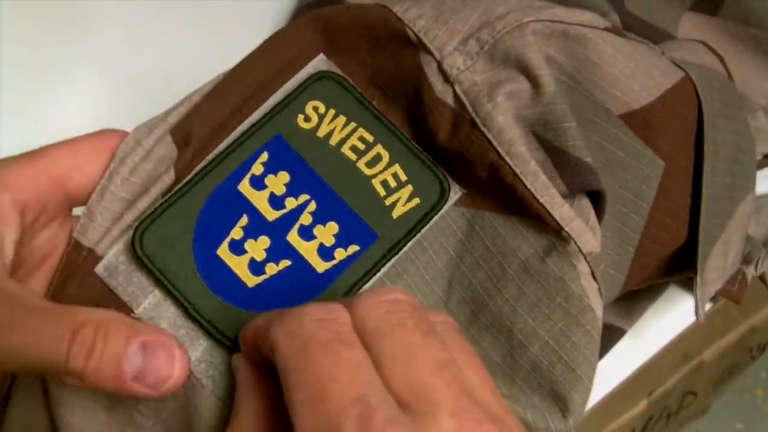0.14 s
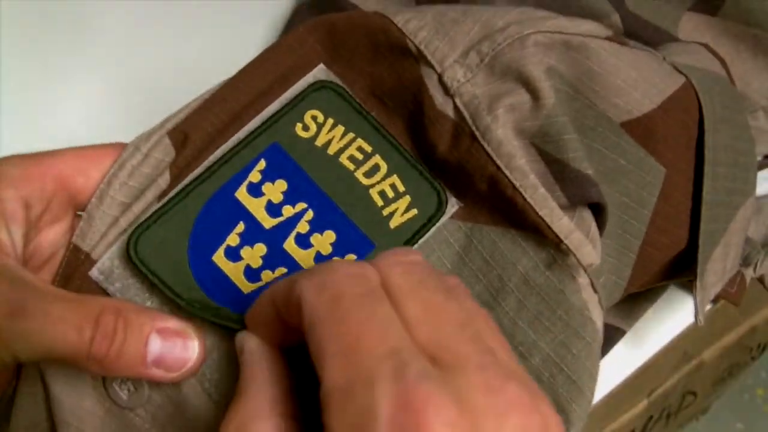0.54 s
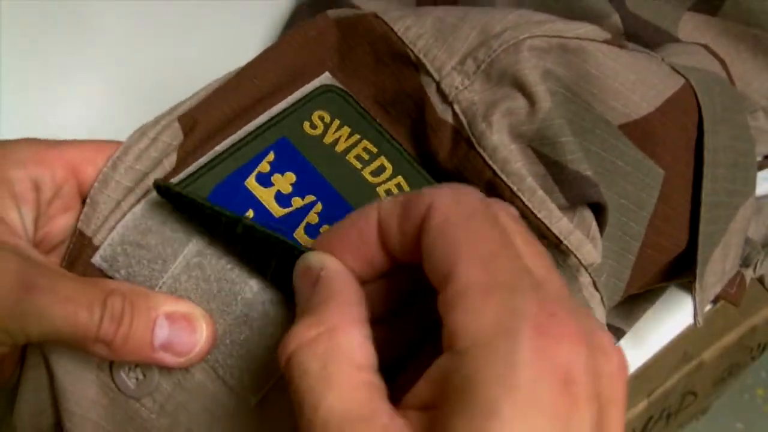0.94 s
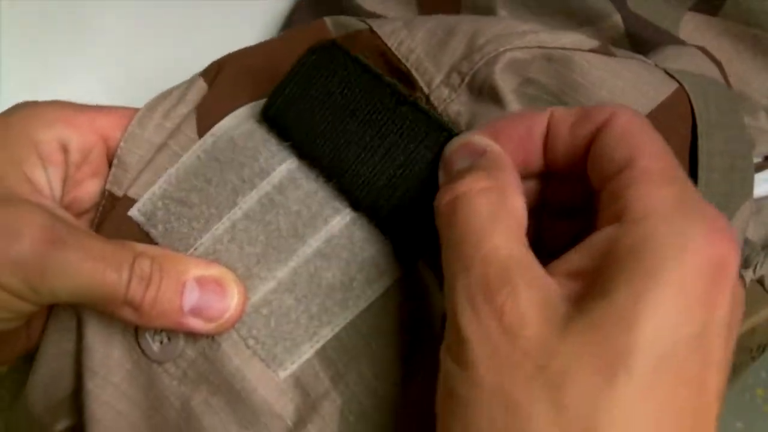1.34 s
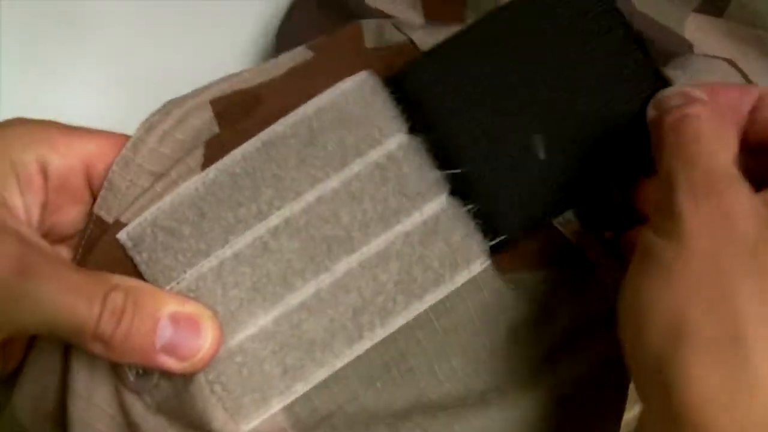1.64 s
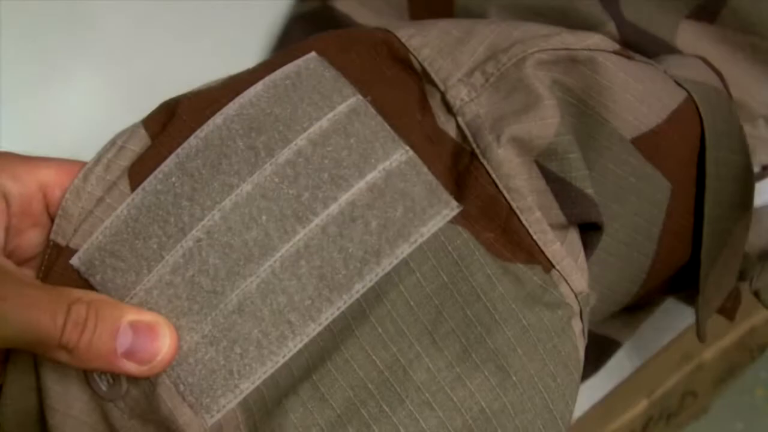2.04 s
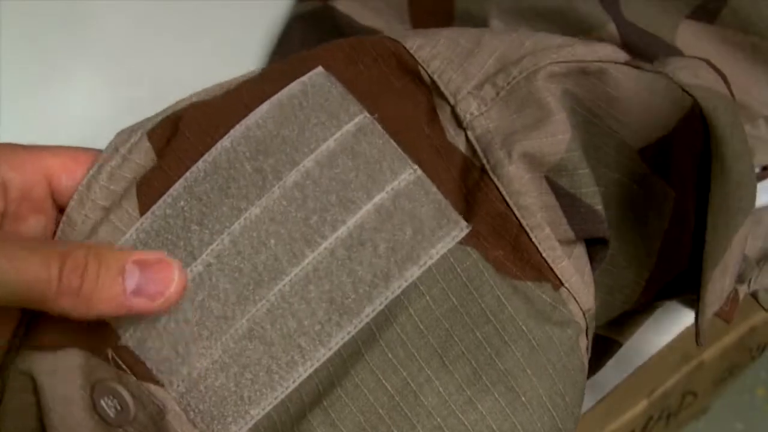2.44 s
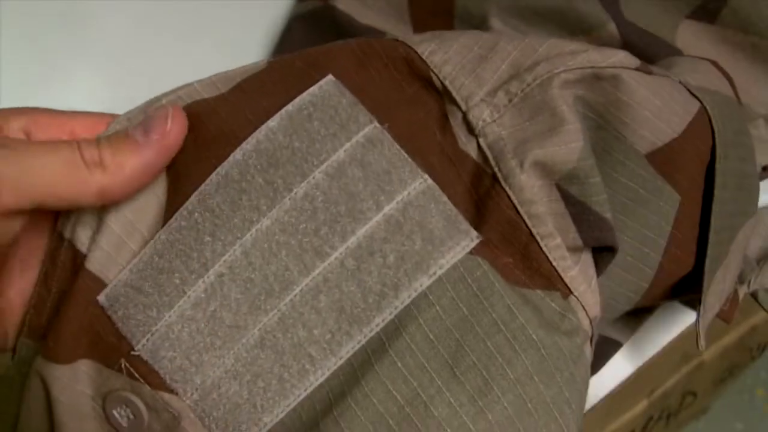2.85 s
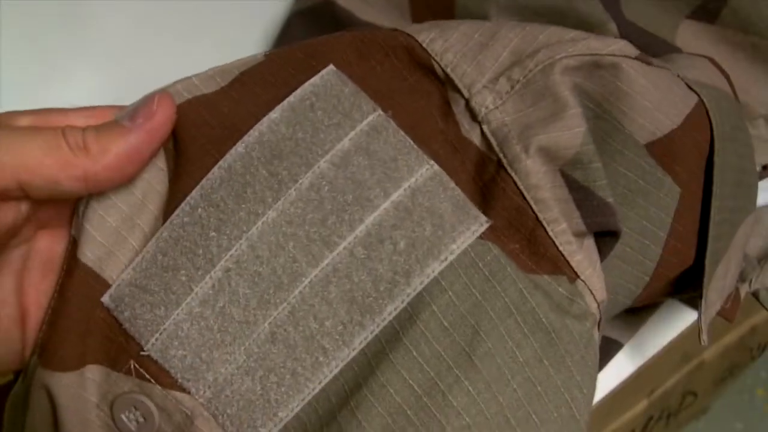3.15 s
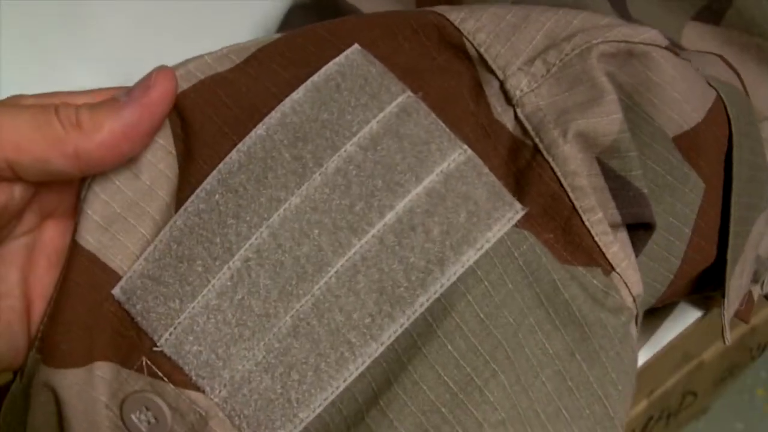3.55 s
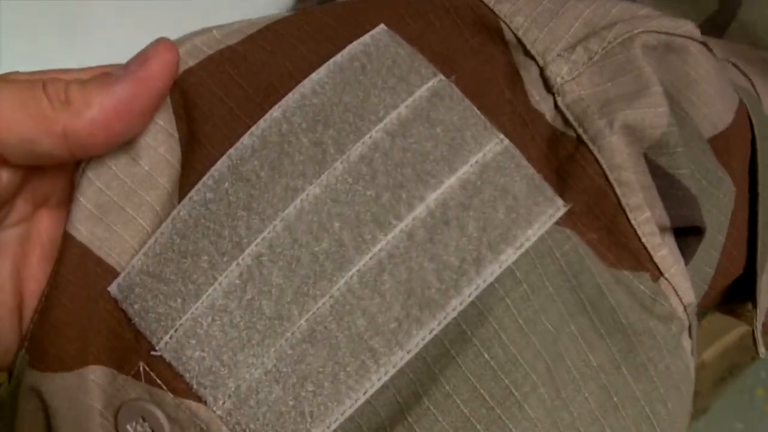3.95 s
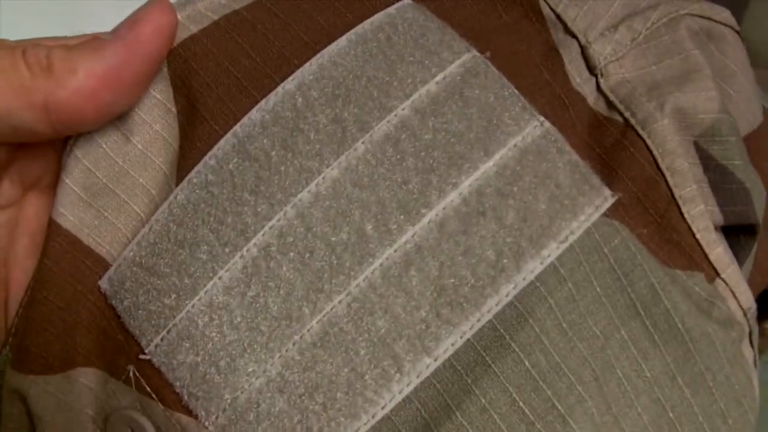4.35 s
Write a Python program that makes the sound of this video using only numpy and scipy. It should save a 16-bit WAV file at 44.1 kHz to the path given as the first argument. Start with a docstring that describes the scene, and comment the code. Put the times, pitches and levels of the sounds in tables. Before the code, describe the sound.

In a small, quiet room, a faint rustle and soft plastic ticks lead into crisp, separate snaps as fingers pick at a hook-and-loop patch. The snaps crowd together and give way to two short, bright rips with a slight thud of stretched cloth. The rest is much quieter: hands brush the jacket and a small plastic part ticks now and then, all close to the microphone.

```python
"""A faint rustle and soft plastic ticks, then sharp snaps: a hook-and-loop patch is picked off a sleeve.
Close to the microphone, in a small quiet room, single hooks snap free as the corner lifts, then crackle,
then let go in whole rows in two quick rips that shake the stretched cloth and the stiff backing.
The jacket rustles under the hands, and a small plastic part ticks near the microphone throughout."""
import sys
import numpy as np
from scipy import signal
from scipy.fft import rfft, irfft
from scipy.io import wavfile
from scipy.ndimage import uniform_filter1d

SR = 44100
rng = np.random.default_rng(int(sys.argv[2]) if len(sys.argv) > 2 else 0)


def generate_wav(signal):
    """Clip the signal to [-1, 1] and save it as 16-bit WAV at the path in sys.argv[1]."""
    frames = np.transpose(np.atleast_2d(signal))
    scaled = np.clip(frames, -1, 1) * 32767
    pcm = np.round(scaled).astype(np.int16)
    wavfile.write(sys.argv[1], SR, pcm)


N = 198625
TIME = np.arange(N) / SR


def from_db(db):
    """Decibels to gain."""
    return 10 ** (np.asarray(db) / 20)


def unit_energy(x):
    """Scale so that the squares sum to one."""
    return x / np.sqrt(np.sum(x ** 2) + 1e-20)


def convolve(x, response):
    """Pass a signal through an impulse response."""
    return signal.fftconvolve(x, response)[:N]


def colour(x, spectrum, size=4096):
    """Minimum-phase filter shaped by rows of freq_hz, level_db; white input keeps its power."""
    hz, db = np.transpose(spectrum)
    grid_hz = np.maximum(np.fft.rfftfreq(size, 1 / SR), 1)
    gain = from_db(np.interp(np.log(grid_hz), np.log(hz), db))
    cepstrum = irfft(np.log(gain))
    cepstrum[1:size // 2] *= 2
    cepstrum[size // 2 + 1:] = 0
    response = irfft(np.exp(rfft(cepstrum)))
    return convolve(x, unit_energy(response))


def drift(rate_hz, count=N, settle=4000):
    """Smooth random wander with a spread of 1."""
    lowpass = signal.butter(2, rate_hz, fs=SR, output="sos")
    slow = signal.sosfilt(lowpass, rng.standard_normal(count + settle))
    return slow[settle:] / slow.std()


def clicks(times, heights):
    """One impulse at each time."""
    return np.bincount(np.clip(np.round(times * SR).astype(int), 0, N - 1), heights, N)


def ring(x, hz, t60_s):
    """A unit click sets a dying tone of height 1 ringing."""
    decay, angle = from_db(-60 / (t60_s * SR)), 2 * np.pi * hz / SR
    return signal.lfilter([.5, 0, -.5], [1, -2 * decay * np.cos(angle), decay * decay], x + 1e-18)


# Room tone at the microphone: freq_hz, level_db
AIR_SPECTRUM = [(25, -29.5), (60, -24), (120, -16), (250, -9), (400, -0.5), (750, 0), (1200, 2.5),
                (1600, -2.5), (2500, -3.5), (5000, -5), (8000, -6), (11000, -4), (14800, -5),
                (15600, -25.5)]
def room_tone(level_db=-67.5):
    """The still air of the small room, a faint steady hiss."""
    return from_db(level_db) * colour(rng.standard_normal(N), AIR_SPECTRUM)


def reflections(t60_s, first_s=0.0022, smooth_bins=120):
    """Dense dying echoes that favour no pitch."""
    age = TIME[:SR // 2]
    onset = np.clip(age / first_s - .5, 0, 1)
    spectrum = rfft(rng.standard_normal(len(age)) * onset * from_db(-60 * age / t60_s))
    flattened = spectrum / np.sqrt(uniform_filter1d(np.abs(spectrum) ** 2, smooth_bins))
    echoes = irfft(flattened, len(age)) * onset
    return unit_energy(echoes[:-SR // 10])


# What the walls send back to the microphone: freq_hz, level_db
WALL_SPECTRUM = [(60, -10.5), (300, -2), (900, 0), (2000, 0), (6000, -1), (11000, -1), (16000, -3)]
def room_echo(x, early_db=-12.0, late_db=-28.5):
    """Quick scatter from the table and nearby things, then the faint tail of the room."""
    early = from_db(early_db) * reflections(t60_s=0.068)
    late = from_db(late_db) * reflections(t60_s=0.34)
    return colour(convolve(x, early + late), WALL_SPECTRUM)


# Hands sliding over the jacket, close by: middle_s, length_s, level_db
HAND_STROKES = [(0.09, 0.25, -66), (1.14, 0.11, -61.5), (1.893, 0.1, -65), (2.313, 0.022, -61),
                (2.45, 0.19, -63), (2.83, 0.24, -68), (3.136, 0.17, -67), (3.98, 0.31, -68)]
# Sliding cloth: freq_hz, level_db
RUSTLE_SPECTRUM = [(60, -35.5), (200, -13), (600, 0.5), (1200, 2), (2500, -6), (5000, -3.5), (8000, -2),
                   (11000, -1), (14500, -4.5), (16000, -25.5)]
def cloth_rustle(gain_db=0.5, grain_db=1.5, catches_per_s=90, catch_db=15.5):
    """Each stroke swells and fades; the weave makes it grainy, and now and then a thread catches."""
    power = sum(from_db(db) ** 2 * np.exp(-(2 * (TIME - middle) / length) ** 2)
                for middle, length, db in HAND_STROKES)
    catches = (rng.random(N) < catches_per_s / SR) * rng.uniform(-1.5, 1.1, N) * from_db(catch_db)
    sliding = rng.standard_normal(N) * from_db(grain_db * drift(rate_hz=300))
    return colour((sliding + catches) * np.sqrt(power) * from_db(gain_db), RUSTLE_SPECTRUM)


# Soft plastic ticks near the microphone: start_s, tick_db, low_ring_db
PLASTIC_TICKS = [(0.0206, -38, -59), (0.2538, -33, -77.5), (0.3883, -38.5, -63), (0.7058, -36.5, -62),
                 (0.8051, -34, -67), (1.0242, -35, -64.5), (1.1062, -33.5, -76), (1.357, -34, -60.5),
                 (1.4894, -34, -68.5), (2.0555, -44, -58.5), (2.3056, -34.5, -66.5), (2.425, -38.5, -60),
                 (2.5053, -49, -87), (2.6239, -38, -59), (2.7416, -31.5, -68), (2.841, -37.5, -69),
                 (3.8579, -32.5, -78), (4.027, -40, -60), (4.1259, -34, -64)]
# Modes of the plastic part, the two long ones first: pitch_hz, level_db, t60_s
PLASTIC_MODES = [(388, 9.5, 0.1), (1107, 7.5, 0.22), (571.7, -26, 0.046), (1058, -13, 0.045),
                 (1243.5, -5.5, .03), (1334, -7, 0.027), (1470, -20.5, 0.045), (2093, -26.5, 0.048),
                 (2420, -47, .014), (3040, -18, 0.023), (3873, -26, 0.0047)]
def plastic_ticks(touch_s=0.001935, touch_db=-6.5, bounce_s=0.00402, bounce_db=-1.5, contact_db=-3.0):
    """A light touch, the tick and a bounce strike the short modes; the tick also rings two long ones."""
    times, tick_db, low_ring_db = np.transpose(PLASTIC_TICKS)
    hardness_db = tick_db + 33.0   # above a usual tick
    high_ring_db = -63.0 + 1.8 * hardness_db
    long_modes, short_modes = PLASTIC_MODES[:2], PLASTIC_MODES[2:]
    pivot_hz = long_modes[1][0]
    ticks = np.zeros(N)
    for (hz, mode_db, t60_s), ring_db in zip(long_modes, (low_ring_db, high_ring_db)):
        ticks += ring(clicks(times, from_db(ring_db + mode_db)), hz, t60_s)
    bounce_times = times + bounce_s * (1 + 0.17 * rng.standard_normal(len(times)))
    for hz, mode_db, t60_s in short_modes:
        tilt_db = 0.95 * hardness_db * np.log2(hz / pivot_hz)   # a harder tick is brighter
        chance_db = 1.8 * rng.standard_normal(len(times))
        heights = from_db(tick_db + contact_db + mode_db + tilt_db + chance_db)
        touches = clicks(times - touch_s, heights * from_db(touch_db))
        bounces = clicks(bounce_times, heights * from_db(bounce_db))
        ticks += ring(touches + clicks(times, heights) + bounces, hz, t60_s)
    # so small a part gives no bass, and the soft contact no treble
    return signal.sosfilt(signal.butter(3, [300, 3450], "band", fs=SR, output="sos"), ticks)


def hook_cracks(times, heights, whip_db, whip_t60_s, size=160):
    """Each hook gives a sharp release, then its own brief whipping of fibres."""
    age = np.arange(size) / SR
    whip_envelope = unit_energy(from_db(-60 * age / whip_t60_s)) * from_db(whip_db)
    shapes = rng.standard_normal((len(times), size)) * whip_envelope
    shapes[:, 0] = 1   # the release
    shapes *= (heights / np.linalg.norm(shapes, axis=1))[:, None]
    return clicks((times[:, None] + age).ravel(), shapes.ravel())


# Spells of picking and slow peeling: start_s, end_s, snaps_per_s, bite_db, edge_db
PICKING_SPELLS = [(0.489, 0.511, 80, -30, -32), (0.76, 0.815, 54, -34, -28), (0.861, 0.871, 400, -15, -8.5),
                  (0.929, 0.955, 310, -9.5, -5), (1.134, 1.155, 90, -31, -38), (2.25, 2.65, 5, -52, -41),
                  (3.059, 3.181, 20, -44, -39.5)]
def picking(spread_db=3):
    """Hooks snap unevenly through each spell; gives rows of start_s, bite_db, edge_db."""
    snaps = []
    for start, end, snaps_per_s, bite_db, edge_db in PICKING_SPELLS:
        count = max(int(round((end - start) * snaps_per_s)), 1)
        times = start + (end - start) * (np.arange(count) + rng.random(count)) / count
        levels_db = [bite_db, edge_db] + spread_db * rng.standard_normal((count, 2))
        snaps.append(np.column_stack([times, levels_db]))
    return np.vstack(snaps)


# Lone hooks that stand out at close range: start_s, bite_db, edge_db
CLEAR_SNAPS = [(0.4364, -5, -5.5), (0.4712, -16.5, -23), (0.5245, -21, -21), (0.5293, -10, -5.5),
               (0.5822, -4.5, -3.5), (0.6395, -32, -38), (0.6538, -12, -4), (0.729, -29, -29),
               (0.744, -10, -3.5), (0.7452, -7.5, -8), (0.8053, -40, -22.5), (0.8474, -15.5, -10),
               (0.8784, -0.5, 1), (0.8834, -9.5, -9), (0.9028, -11, -1.5), (0.9097, -7, -4),
               (0.9198, -0.5, -4), (0.9235, -4, -8), (0.9696, -19, -1.5), (0.978, -18, -14),
               (0.9872, -7.5, -7), (1.0938, -14, -10.5), (1.12, -31, -27), (1.16, -14, -15.5),
               (1.1643, -9.5, -9), (1.282, -14, -3), (1.293, -11.5, -6), (1.4184, -36, -13),
               (1.421, -18, -5), (1.4312, -10.5, -8.5), (1.4537, -10.5, -7.5), (2.5273, -40, -35),
               (2.9182, -36, -36)]
# A lone hook's bite, its bright edge and the backing's thud: freq_hz, level_db
BITE_SPECTRUM = [(20, -66.5), (800, -25.5), (1500, -15.5), (2000, -9), (2700, -7.5), (3600, -1.5),
                 (5500, -1.5), (7000, 0.5), (8500, -11.5), (11000, -24)]
EDGE_SPECTRUM = [(20, -70), (3500, -29), (6500, -18), (8300, -3.5), (11000, 1), (13000, -1), (15000, -7.5),
                 (16500, -19.5)]
THUD_SPECTRUM = [(20, -44.5), (100, -22.5), (250, -20), (500, -3.5), (800, 4), (1000, 0.5), (1300, 5),
                 (1700, -15), (3000, -21), (8000, -47)]
def single_hooks(edge_lift_db=1.5, thud_db=-5.5, thud_fade_db_per_s=6.0, echo_db=-0.5):
    """Lone hooks crack, each with its own bite and bright edge, and jolt the backing; the room answers."""
    times, bite_db, edge_db = np.vstack([CLEAR_SNAPS, picking()]).T
    bite_gain, edge_gain = from_db(bite_db), from_db(edge_db + edge_lift_db)
    bites = colour(hook_cracks(times, bite_gain, whip_db=-1.5, whip_t60_s=0.0051), BITE_SPECTRUM)
    edges = colour(hook_cracks(times, edge_gain, whip_db=4.5, whip_t60_s=0.004), EDGE_SPECTRUM)
    fade_db = thud_fade_db_per_s * (times - times[0])   # the thud weakens as the patch comes loose
    thuds = colour(clicks(times, from_db(bite_db + thud_db - fade_db)), THUD_SPECTRUM)
    # the walls get each crack from all sides, so the chance colour of its whipping evens out there
    even_edges = colour(clicks(times, edge_gain), EDGE_SPECTRUM)
    even_bites = colour(clicks(times, bite_gain), BITE_SPECTRUM)
    return edges - bites - thuds + from_db(echo_db) * room_echo(even_edges - even_bites - thuds)


def freed_hooks(contour, hook_db=-7.5, spread_db=3.0, slip_db=3.0, slip_hz=240):
    """Hooks hold about equal force, so louder is more hooks a second; contour: time_s, level_db, boom_db."""
    knots_s, level_db, boom_db = np.transpose(contour)
    t = knots_s[0] + np.arange(max(int((knots_s[-1] - knots_s[0]) * SR), 2)) / SR
    power = from_db(np.interp(t, knots_s, level_db)) ** 2
    stick_slip = from_db(slip_db * drift(slip_hz, count=len(t))) ** 2
    peeled = np.cumsum(power * stick_slip)
    count = int(power.sum() / from_db(hook_db) ** 2) + 1
    jitter, polarity = rng.random((count, 2)).T
    times = np.interp((np.arange(count) + jitter) / count, peeled / peeled[-1], t)
    sizes = from_db(spread_db * np.clip(rng.standard_normal(count), -2, 2)) * np.sign(polarity - .5)
    heights = unit_energy(sizes) * np.sqrt(power.sum())
    return times, heights, np.interp(times, knots_s, level_db), np.interp(times, knots_s, boom_db)


# Clumps of hooks along the peel line: start_s, level_db
HOOK_CLUMPS = [(1.1751, -19.5), (1.186, -23.5), (1.195, -20.5), (1.266, -18.5), (1.5406, -18.5),
               (1.55, -24), (1.5567, -16), (1.651, -13.5), (1.717, -18.5), (1.74, -20.5), (1.7525, -20.5),
               (1.773, -16.5)]
def clumps(length_s=0.0038, boom_db=-15):
    """A clump gives way almost at once, in one short, level burst of hooks."""
    return [freed_hooks([(start, db, boom_db), (start + length_s, db, boom_db)])
            for start, db in HOOK_CLUMPS]


# Pulls on the patch: start_s, hardest_s, end_s, level_db, boom_db (cloth, relative to the cracks)
HAND_PULLS = [(1.199, 1.228, 1.247, -19, -14.5), (1.253, 1.262, 1.279, -20, -16),
              (1.56, 1.612, 1.646, -15, -12.5), (1.656, 1.674, 1.694, -19.5, -16),
              (1.697, 1.709, 1.737, -24, -14.5), (1.761, 1.788, 1.809, -21.5, -15)]
def pulls(tighten_db_per_s=105, ease_db_per_s=230):
    """Rows of hooks tear as the hand tightens slowly to its hardest moment, then eases faster."""
    hooks = []
    for start, hardest, end, db, boom_db in HAND_PULLS:
        start_db = db - tighten_db_per_s * (hardest - start)
        end_db = db - ease_db_per_s * (end - hardest)
        contour = [(start, start_db, boom_db), (hardest, db, boom_db), (end, end_db, boom_db)]
        hooks.append(freed_hooks(contour))
    return hooks


# Tearing rows, stretched cloth and taut backing, close to the microphone: freq_hz, level_db
TEAR_SPECTRUM = [(20, -69), (900, -31), (1600, -12), (2200, -5), (3000, -3), (4200, -2.5), (5800, -2.5),
                 (7800, -1), (9500, 1.5), (11800, 1.5), (13500, -2.5), (15100, -4.5), (15800, -27.5)]
BOOM_SPECTRUM = [(20, -57.5), (70, -31.5), (130, -22), (220, -16), (280, -10), (450, -3), (650, 1.5),
                 (900, -1), (1200, 4.5), (1600, -5), (2500, -17), (6000, -41.5)]
TAUT_SPECTRUM = [(20, -80), (2000, -30), (4300, -15.5), (5300, -1), (6700, -2.5), (8000, -6), (11000, -8),
                 (15000, -18)]
def rips(taut_db=-6.5, full_strain_db=-14.0, strain_slope=1.4):
    """Hooks crack in pulls and clumps, shake the cloth and, under the hardest strain, twang the backing."""
    times, heights, level_db, boom_db = np.hstack(pulls() + clumps())
    cracks = hook_cracks(times, heights, whip_db=-1.0, whip_t60_s=0.0038)
    jolts = clicks(times, heights * from_db(boom_db))
    strain = from_db(taut_db + strain_slope * np.minimum(level_db - full_strain_db, 0))
    twangs = hook_cracks(times, heights * strain, whip_db=11.5, whip_t60_s=0.006)
    return colour(cracks, TEAR_SPECTRUM) + colour(jolts, BOOM_SPECTRUM) + colour(twangs, TAUT_SPECTRUM)


def scene():
    """One microphone close to the sleeve: the patch, the ticks and the cloth over the room tone."""
    air = room_tone()
    snapping, tearing = single_hooks(), rips()
    return (air + snapping + tearing + room_echo(tearing) + plastic_ticks() + cloth_rustle())[None]


def record(dry, cutoff_hz=15900):
    """The recorder slightly rounds the highest peaks and cuts the top of the treble."""
    rounded = 2.14 * np.tanh(dry / 2.374)
    return signal.sosfilt(signal.ellip(10, .2, 80, cutoff_hz, fs=SR, output="sos"), rounded)


dry = scene()
out = record(dry)
generate_wav(out)
```